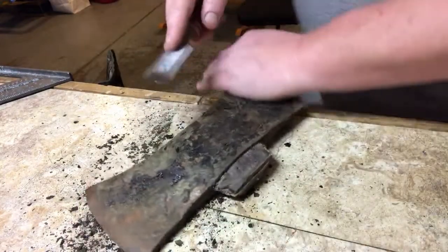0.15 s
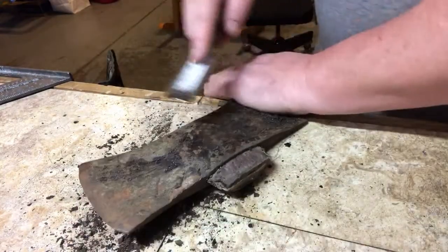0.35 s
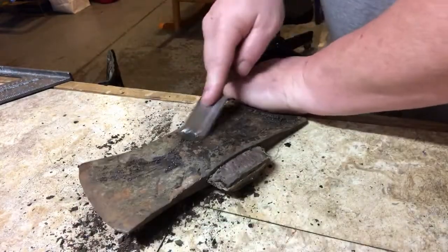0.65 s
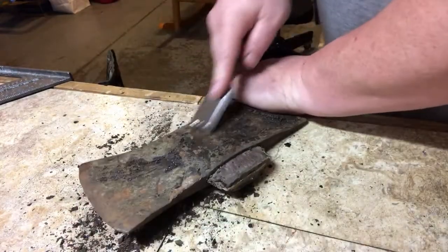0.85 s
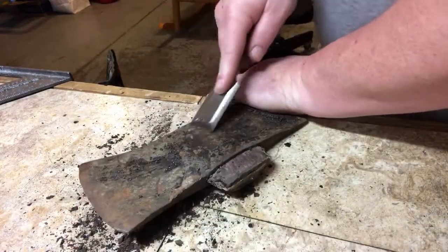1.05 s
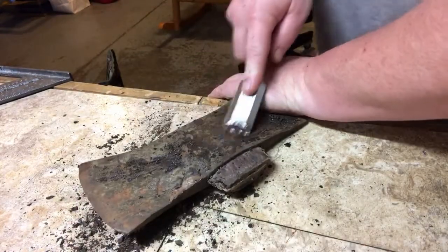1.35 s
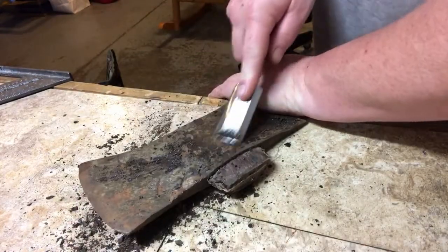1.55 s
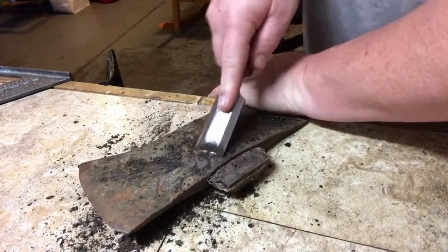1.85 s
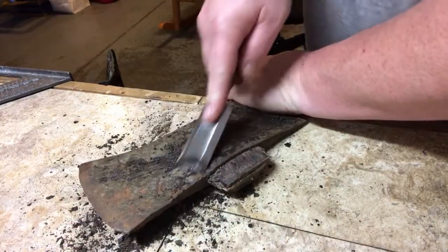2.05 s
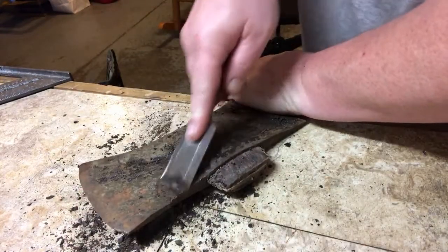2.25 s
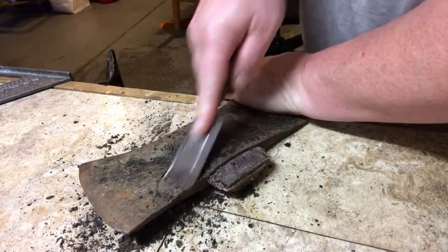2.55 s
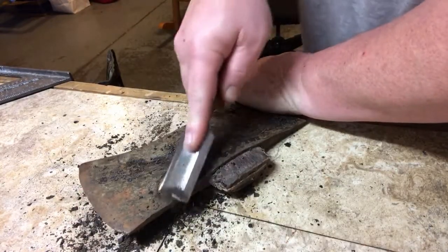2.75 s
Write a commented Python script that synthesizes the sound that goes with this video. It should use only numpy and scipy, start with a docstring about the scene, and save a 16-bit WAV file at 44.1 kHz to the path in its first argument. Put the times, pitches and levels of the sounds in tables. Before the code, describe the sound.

Chisel scraping a rusty axe head: first the heavy head thuds down on a bench, then a knock and quick, gritty to-and-fro metal strokes with small clicks; close microphone in a quiet indoor workshop.

```python
"""Scraping a rusty axe head

Close to a bench in a quiet workshop, by a microphone that stands on the bench. Skin brushes rusty steel, the axe
head is set down, and a steel chisel taps it and scrapes asphalt off it in quick to-and-fro strokes.
Breaking grit is filtered noise, the singing blade a wavering sine, the ringing bench decaying sines and resonances.
Steel comes by air and off the walls, the bench straight through the stand; hum and hiss lie behind."""
import sys
import numpy as np
from scipy import signal
from scipy.fft import rfft, irfft, next_fast_len
from scipy.io import wavfile
from scipy.ndimage import uniform_filter1d, map_coordinates

SR = 44100
rng = np.random.default_rng(int(sys.argv[2]) if len(sys.argv) > 2 else 0)


def dump_mix(stems):
    """Bounce the given channels to the path in sys.argv[1] as a 16-bit WAV at rate SR."""
    frames = np.atleast_2d(stems).T  # one column per channel
    limited = np.clip(frames, -1, 1)  # hard clip at full scale
    pcm = np.round(limited * 32767).astype(np.int16)
    wavfile.write(sys.argv[1], SR, pcm)


def undo_db(level):
    """Turn decibels back into plain size, where 20 dB means ten times bigger."""
    steps = np.asarray(level, float) / 20
    return 10 ** steps


N = 127890  # samples
T = np.arange(N) / SR  # time_s

# Chisel strokes: start_s, length_s, strength_db (before a common shift), bench_db (against the stroke),
# peak_share (part of the length before the hardest moment, held within 0.1 to 0.9)
STROKES = [(0.488, 0.14, -41.5, -6, 0.75), (0.676, 0.079, -54.5, 5, 0.51), (0.783, 0.13, -39, -6.5, 0.28),
           (0.913, 0.11, -54, 7.5, 0.69), (1.034, 0.13, -44.5, -4.5, 0.47), (1.182, 0.11, -40, -4, 0.47),
           (1.303, 0.11, -34, -6.5, 0.57), (1.457, 0.068, -46.5, 8, 0.38), (1.553, 0.13, -33.5, -4.5, 0.4),
           (1.717, 0.078, -52.5, 2.5, 0.15), (1.824, 0.11, -40.5, -8, 0.71),
           (1.952, 0.07, -57.5, -16, 0.81), (2.077, 0.12, -38.5, -12, 0.65),
           (2.209, 0.17, -52.5, -2.5, 0.099), (2.349, 0.084, -32.5, -13.5, 0.73),
           (2.465, 0.084, -39.5, -7, 0.57), (2.608, 0.092, -31.5, -11, 0.58),
           (2.737, 0.075, -34, -11, 0.54), (2.872, 0.11, -48, -14, 0.32)]
# Steepness of the blade, heard as brightness of the grit: time_s, treble_db
BLADE_ANGLE = [(.55, -6), (.72, 5), (.84, -1.5), (1.0, 3.5), (1.1, -6), (1.23, 5), (1.36, 8.5), (1.49, 7.5),
               (1.61, 2), (1.88, 6), (2.13, -3.5), (2.25, 5), (2.4, -4), (2.51, 6), (2.66, -10),
               (2.78, -14)]
# Broad rattle of axe and chisel, relative spectrum: frequency_hz, density_db (per Hz)
STEEL_BROAD = [(410, -74), (700, -16), (863, -10.5), (1540, 5), (2020, -3.5), (2220, -5.5), (3370, -1.5),
               (4610, -5.5), (5840, -13.5), (7110, -14), (9480, -19), (10500, -28), (16000, -28)]
# Modes of axe and chisel: frequency_hz, width_hz, level_db (over the broad rattle)
STEEL_MODES = [(1426, 35, -5.5), (1634, 30, 1), (1846, 46, 1.5), (2766, 27, 4.5), (3437, 20.3, 0.5),
               (4020, 24, 7), (4510, 310, -3), (5305, 30, 15.5)]
# Chatter of the blade: start_s, length_s, level_db, ring_out_t60_s
CHATTER = [(0.686, 0.0075, -47, .06), (1.885, 0.024, -48, .07), (2.16, 0.021, -40.5, 0.12),
           (2.395, 0.029, -39, 0.082), (2.482, 0.038, -50, 0.12), (2.667, 0.024, -38, 0.034)]
# Hard contacts: the axe head meets the bench, then the chisel's edge lands or catches:
# time_s, level_db (before a common shift), treble_db (against the level), t60_s
TAPS = [(0.2087, -19.5, -36, 0.028), (0.2137, -33, 15, 0.0078), (0.2193, -22.5, -26, 0.024),
        (0.2308, -23, -11, 0.026), (0.2463, -41, 16, 0.015), (0.2563, -27.5, -7, 0.021),
        (0.466, -13, -43, 0.028), (0.5175, -30.5, -29, 0.018), (0.6906, -30, 10.5, 0.04),
        (0.801, -27, 4, 0.028), (0.942, -25.5, 4.5, 0.05), (0.976, -26, -2, 0.017), (1.059, -29, 10, 0.039),
        (1.115, -33, 4, 0.034), (1.15, -41, 17, 0.0088), (1.177, -37.5, 16.5, 0.032),
        (1.319, -26.5, -11, 0.03), (1.8682, -20, -20, 0.046), (1.9811, -44, 15, 0.018),
        (2.09, -26.5, -10, 0.047), (2.1231, -28.5, 17, 0.0076), (2.2287, -23.5, -23, 0.062),
        (2.629, -31.5, 12, 0.016), (2.6398, -19.5, -36, 0.017)]
# Resonances of the bench top, relative: frequency_hz, width_hz, level_db
BENCH_TOP = [(248.6, 38.4, -0.5), (349.6, 9.2, -1.5), (413.5, 51.5, -3.5), (512, 81, -0.5), (610, 41.2, 0)]
# The hand's shove on the bench: time_s, level_db
PUSH = [(0.449, -39.5), (0.49, -39), (0.57, -51), (0.63, -38), (0.67, -45), (0.71, -39), (0.8, -56.5),
        (0.84, -34), (1.01, -41), (1.04, -41.5), (1.18, -39), (1.24, -46.5), (1.49, -37.5), (1.55, -51),
        (1.6, -38), (1.658, -28.5), (1.72, -41), (1.79, -40.5), (1.81, -45), (1.88, -27.5), (1.919, -27),
        (1.97, -36.5), (2.08, -38.5), (2.16, -21), (2.18, -29.5), (2.3, -43.5), (2.41, -30.5), (2.46, -30),
        (2.54, -38.5), (2.56, -39.5), (2.59, -41), (2.67, -26.5), (2.7, -31.5), (2.76, -43), (2.85, -45),
        (2.9, -34)]
# Lowest resonances of the bench, relative: frequency_hz, width_hz, level_db
BENCH_LOW = [(60.8, 14.94, 5), (114.5, 30.3, 2), (168.7, 15.4, -5.5), (257.3, 26.3, -17)]
# The axe head lands and rocks: time_s, level_db
LANDING = [(0.2123, -18.5), (0.218, -13.5), (.233, -20.5), (0.26, -22), (0.28, -42)]
# Bench under a heavy blow: frequency_hz, level_db (against the contact), t60_s (before the hand damps it)
BENCH_THUD = [(73, -9, 0.79), (108.5, 6.5, 0.16), (151.7, -1, 0.2), (196, -7, 0.102), (338, -16, 0.099),
              (474, -25, 0.11), (590, -10.5, 0.23), (622, -10, 0.055), (758, -13, 0.1), (954, -19, 0.051)]
# Loose crumbs and tools jumping, relative spectrum: frequency_hz, density_db (per Hz)
LOOSE_RATTLE = [(150, -11), (250, 2.5), (444, -5.5), (761, -9), (1350, -23.5), (3000, -21.5), (6140, -39),
                (16000, -56)]
# A hand brushes the rusty steel: middle_s, half_length_s, level_db
BRUSHES = [(0.02, 0.019, -65.5), (0.101, 0.029, -59)]
# Skin on rust, relative spectrum: frequency_hz, density_db (per Hz)
SKIN = [(1000, -59), (1520, 0), (1690, -18), (2030, -3), (2740, -16), (5830, -10), (16000, -20)]
# Workshop hum and hiss, relative spectrum: frequency_hz, density_db (per Hz)
SHOP_HUM = [(30, -20), (110, 5), (200, -8), (575, -11), (1290, -15), (1890, -16), (2990, -14.5),
            (3430, -16), (4870, -23.5), (5880, -22), (10400, -34.5), (14800, -31), (16000, -34)]
# One faint brief tone: start_s, length_s, pitch_hz, level_db
SQUEAK = (.07, .055, 2050, -62)
# Reverberation: frequency_hz, t60_s
ROOM_DECAY = [(200, 1), (2000, 0.17), (10000, 0.22)]


def unit(x):
    """Scale to rms 1."""
    return x / np.sqrt(np.mean(x ** 2) + 1e-20)


def along(points, hz):
    """Read (Hz, value) points on a log frequency axis."""
    f, value = np.transpose(points)
    return np.interp(np.log(hz + 1), np.log(f + 1), value)


def wobble(rate):
    """A smooth random curve, rate knots a second."""
    return map_coordinates(rng.standard_normal(N // 50), [T * rate])


def filtered(x, response):
    """Multiply the spectrum of x by a complex response of frequency."""
    size = next_fast_len(N + SR // 2)
    return irfft(rfft(x, size) * response(np.fft.rfftfreq(size, 1 / SR)), size)[:N]


def causal(points):
    """Minimum-phase response of a (Hz, dB) spectrum, by folding its cepstrum."""
    def response(hz):
        cepstrum = irfft(np.log(undo_db(np.maximum(along(points, hz), -90))))
        half = len(cepstrum) // 2
        cepstrum[1:half] *= 2
        cepstrum[half + 1:] = 0
        return np.exp(rfft(cepstrum))
    return response


def resonant(peaks):
    """Causal sum of (Hz, width, dB) resonances with alternating signs."""
    def response(f):
        total = 0
        for k, (center, width, db) in enumerate(peaks):
            damping = 1j * f * width
            total = total + (-1) ** k * undo_db(db) * damping / (center ** 2 - f ** 2 + damping)
        return total
    return response


def gain(response):
    """Rms gain of a response for white input."""
    return np.sqrt(np.mean(np.abs(response(np.fft.rfftfreq(2 ** 15, 1 / SR))) ** 2))


def smooth_field(shape, bins, frames):
    """Random time-frequency pattern of rms 1, averaged over some bins and frames."""
    field = uniform_filter1d(rng.standard_normal(shape), size=bins, axis=0)
    return unit(uniform_filter1d(field, size=frames, axis=1))


def grit():
    """Crumbs breaking at random moments, in clumps, each patch of surface with its own colour."""
    crumbs_per_s, spread_db = 9000, 2.2
    clump_db, patch_db, burst_db = 1.2, 3, 2.5  # stutter of the edge, slow colours, quick bursts in a band
    chance, size = rng.random((2, N))
    strength = undo_db(-spread_db * np.log(1 - .99 * size))
    crumbs = (chance < crumbs_per_s / SR) * strength * rng.standard_normal(N)
    z = signal.stft(crumbs * undo_db(clump_db * wobble(90)), nperseg=512)[2]
    patches = signal.istft(z * undo_db(patch_db * smooth_field(z.shape, 3, 9)), nperseg=512)[1]
    z = signal.stft(patches, nperseg=128)[2]
    bursts = signal.istft(z * undo_db(burst_db * smooth_field(z.shape, 4, 4)), nperseg=128)[1]
    return unit(bursts[:N])


def steel(f, modes_db=0):
    """Axe head and chisel: a broad rattle with modes standing out."""
    return causal(STEEL_BROAD)(f) * (1 + undo_db(modes_db) * resonant(STEEL_MODES)(f))


def treble(f):
    """The top of the steel's rattle, through a second-order high-pass."""
    return steel(f) * (1j * f / (3300 + 1j * f)) ** 2


def scrape():
    """Each stroke swells to its hardest moment and lifts; grit sounds in the steel and, duller, in the bench."""
    rest_s, rest_db, rest_wood_db = .47, -65.5, -64  # from rest_s on the edge drags faintly
    peak_db, sag_db = -0.5, 6  # common level shift; even sag away from the hardest moment
    bite_db, lift_db, suddenness = 20.5, 30, 3.2  # further fall at start and end, and its exponent
    bright_per_db = .1  # treble dB gained per dB of lighter touch
    resting = T > rest_s
    edge = undo_db(rest_db + 1.43 * wobble(25.53)) * resting
    light = undo_db(rest_db + 8.5) * resting
    wood = undo_db(rest_wood_db) * resting
    for start, length, db, wood_db, share in STROKES:
        share = np.clip(share, .1, .9)
        top = start + share * length
        before = T < top
        # distance from the hardest moment: 1 at either end of the stroke
        u = np.where(before, (top - T) / share, (T - top) / (1 - share)) / length
        u = np.minimum(u, 3)
        fall_db = sag_db * u + np.where(before, bite_db, lift_db) * u ** suddenness
        stroke = undo_db(db + peak_db - fall_db)
        treble_db = np.interp(top, *np.transpose(BLADE_ANGLE)) + bright_per_db * (-22.5 - db)
        edge = edge + stroke
        wood = wood + stroke * undo_db(wood_db)
        light = light + stroke * undo_db(treble_db)
    bench = resonant(BENCH_TOP)
    metal = filtered(edge * grit(), steel) + filtered(light * grit(), treble)
    return metal / gain(steel) + filtered(wood * grit(), bench) / gain(bench)


def chatter():
    """The blade's lengthwise mode, driven unevenly while the edge chatters and ringing out after."""
    blade_hz, waver_hz, rough_db, attack_s = 5315, 8, 1.2, 0.0023
    drive = np.zeros(N)
    for start, length, db, t60 in CHATTER:
        ring_out_db = -60 * np.maximum(T - start - length, 0) / t60
        drive += undo_db(db + ring_out_db) * np.clip((T - start) / attack_s, 0, 1)
    tone = np.sin(2 * np.pi * np.cumsum(blade_hz + waver_hz * wobble(60)) / SR)
    return np.sqrt(2) * drive * undo_db(rough_db * wobble(180)) * tone


def taps():
    """Short hard contacts: a crumbly burst into the steel, a knock into the bench top."""
    shift_db, rise = -10.5, 0.041  # common level shift; attack time constant as a share of t60
    snap_db, snap_grows, snap_t60_s = 12, .6, .007  # first crack, sharper for harder contacts
    knock_db, knock_grows, knock_s = -16, 1.2, .0003  # push into the bench, much stronger for hard contacts
    bench_db, modes_db = -9.5, -9  # share of the bench; a hard contact barely wakes the steel's modes
    force, bright, knock = np.zeros((3, N))
    for start, db, treble_db, t60 in TAPS:
        t = np.maximum(T - start, 0)
        snap = undo_db(snap_db + snap_grows * (db + 15.5) - 60 * t / snap_t60_s)
        attack = 1 - np.exp(-t / (rise * t60))
        burst = undo_db(db + shift_db) * (undo_db(-60 * t / t60) + snap) * attack
        force += burst
        bright += burst * undo_db(treble_db)
        pulse = t / knock_s * np.exp(1 - t / knock_s)
        knock += undo_db(db + knock_db + knock_grows * (db + 14.5)) * pulse
    crumbs = rng.standard_normal(N)
    bench = resonant(BENCH_TOP)
    metal = filtered(force * crumbs, lambda f: steel(f, modes_db)) + filtered(bright * crumbs, treble)
    wood = filtered(force * crumbs + knock, bench)
    return metal / gain(steel) + undo_db(bench_db) * wood / gain(bench)


def shove():
    """The uneven push of the hand, a noise force, shakes the bench's lowest modes."""
    time, db = np.transpose(PUSH)
    bench = resonant(BENCH_LOW)
    onset = np.clip((T - time[0]) / 0.0065, 0, 1)
    push = undo_db(np.interp(T, time, db) + 1.02 * wobble(40)) * onset
    return filtered(push * rng.standard_normal(N), bench) / gain(bench)


def landing():
    """The head drops and rocks; every contact rings the bench and makes loose things jump."""
    scatter_db, attack_s = 2.5, .0012
    rattle_db, rattle_t60_s = -16, 0.24
    settle_s, settle_t60_s = .325, .15  # the hand presses the head down and damps the bench
    ring, jump = np.zeros((2, N))
    for start, db in LANDING:
        t = np.maximum(T - start, 0)
        attack = 1 - np.exp(-t / attack_s)
        for hz, mode_db, t60 in BENCH_THUD:
            level_db = db + mode_db + scatter_db * rng.standard_normal()
            ring += undo_db(level_db - 60 * t / t60) * np.sin(2 * np.pi * hz * t) * attack
        jump += undo_db(db + rattle_db - 60 * t / rattle_t60_s) * (t > 0)
    damping = undo_db(-60 * np.maximum(T - settle_s, 0) / settle_t60_s)
    loose = causal(LOOSE_RATTLE)
    return ring * damping + filtered(jump * grit(), loose) / gain(loose)


def brush():
    """Soft dry rustle of skin on rust: grit swelling and fading under a coloured filter."""
    touch = np.zeros(N)
    for middle, half, db in BRUSHES:
        touch += undo_db(db - 14 * np.minimum(np.abs(T - middle) / half, 3) ** 3)
    skin = causal(SKIN)
    return filtered(touch * grit(), skin) / gain(skin)


def room(x):
    """The room's answer: a noise tail, each frequency dying at its own speed."""
    hz, t, z = signal.stft(rng.standard_normal(SR // 2), SR, nperseg=256)
    decay = undo_db(-60 * t / along(ROOM_DECAY, hz)[:, None])
    tail = signal.istft(z * decay, SR, nperseg=256)[1]
    late = np.pad(x, (200, 0))  # samples of delay
    return signal.fftconvolve(late, tail / np.linalg.norm(tail))[:N]


def shop():
    """Nearly steady hum and hiss of the workshop, shaped from noise, and one faint squeak."""
    hum = unit(filtered(rng.standard_normal(N), lambda hz: undo_db(along(SHOP_HUM, hz))))
    start, length, hz, db = SQUEAK
    swell = np.sin(np.pi * np.clip((T - start) / length, 0, 1))
    squeak = undo_db(db) * swell * np.sin(2 * np.pi * hz * T)
    return undo_db(-61 + 0.12 * wobble(3.3)) * hum + squeak


def scene():
    """Steel sounds reach the microphone by air and off the walls, the bench straight through its stand."""
    room_db = -19.5
    air = scrape() + chatter() + taps() + brush()
    mix = air + undo_db(room_db) * room(air) + shove() + landing() + shop()
    return mix[None]


def band_limit(x):
    """A steep low-pass at the top of the band."""
    return signal.sosfilt(signal.butter(12, 17030, fs=SR, output="sos"), x)


def record(dry):
    """A phone microphone drops the deepest bass; then a sharp edge ends the spectrum at top_hz."""
    low_cut_hz, top_hz = 47, 15850

    def response(f):
        bass_cut = (1j * f / (low_cut_hz + 1j * f)) ** 3
        return bass_cut * (f < top_hz)

    heard = filtered(dry[0], response)
    return band_limit(heard[None])


dry = scene()
out = record(dry)
dump_mix(out)
```